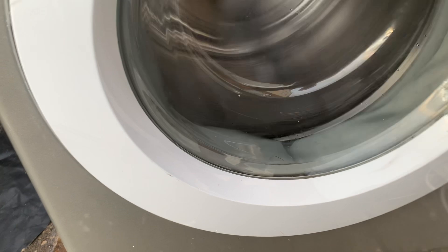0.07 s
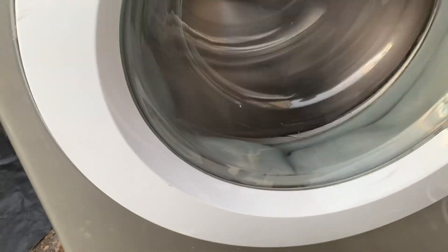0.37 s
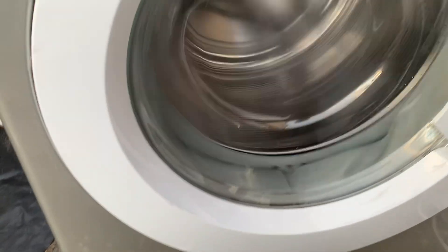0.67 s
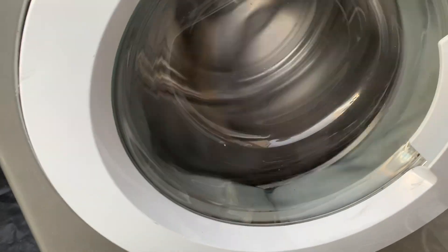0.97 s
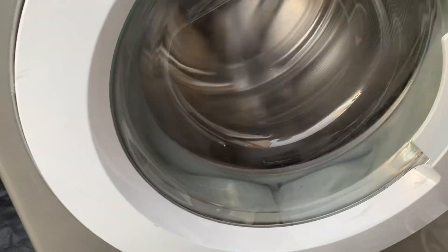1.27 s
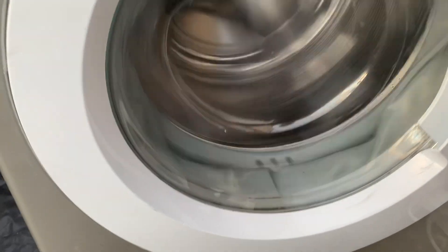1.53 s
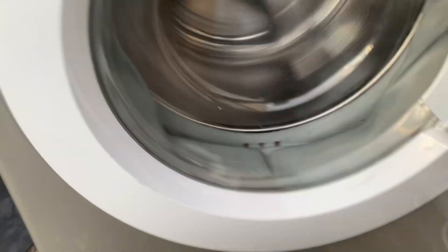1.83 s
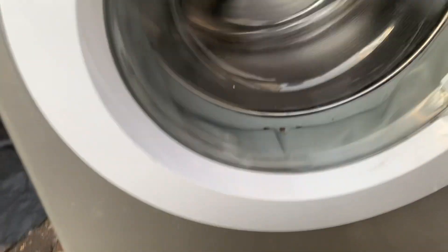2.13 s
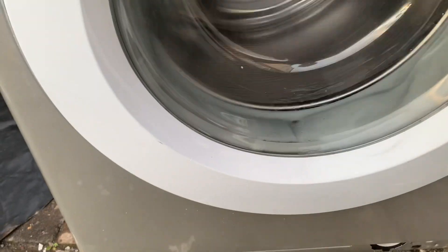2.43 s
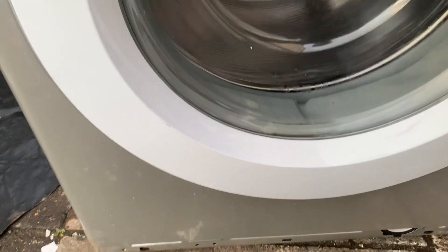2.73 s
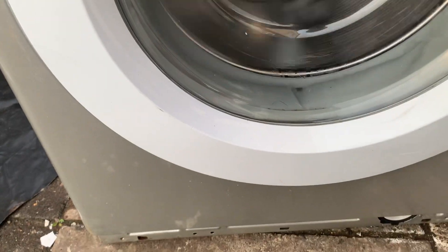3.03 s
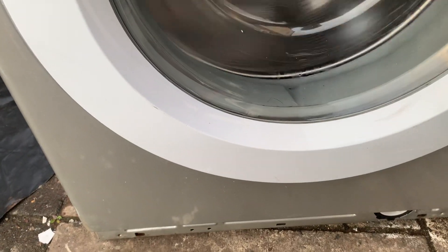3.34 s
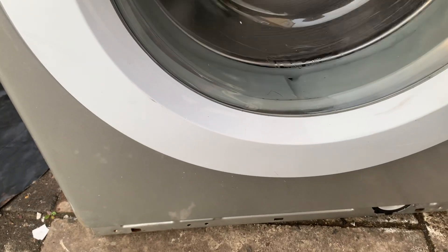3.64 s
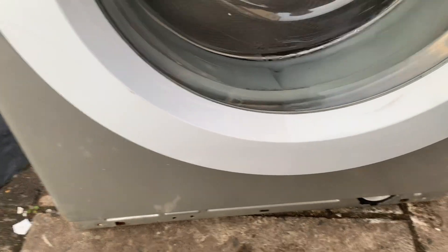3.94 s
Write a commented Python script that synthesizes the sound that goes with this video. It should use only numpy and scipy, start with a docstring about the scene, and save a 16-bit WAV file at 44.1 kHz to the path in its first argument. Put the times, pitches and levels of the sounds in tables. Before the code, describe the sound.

A washing machine rumbles close by outdoors as a loose item thuds and rattles in the steel drum. It clinks four times on the glass door, then the rumble fades to light bumps and rubs.

```python
"""Soft booms and a steel rattle: a loose item tumbles in a washing machine, outdoors, close to the mics.
Its blows boom through the cabinet and ring the drum; four times it clinks on the glass door.
Then the rumble dies away, leaving light bumps and rubs as the drum runs on, brushing the door seal.
The paving adds short reflections over faint open air; the recorder colours and spreads the treble."""
import sys
import numpy as np
from scipy import signal
from scipy.fft import rfft, irfft
from scipy.io import wavfile
from scipy.ndimage import uniform_filter1d

SR = 44100
rng = np.random.default_rng(int(sys.argv[2]) if len(sys.argv) > 2 else 0)


def master(y):
    """Save y as 16-bit WAV."""
    cut = np.clip(np.atleast_2d(y).T, -1, 1)
    pcm = np.round(cut * 32767)  # scale
    wavfile.write(sys.argv[1], SR, pcm.astype(np.int16))


N = 176400

# how hard the drum shakes: t/s, boom/dB, rattle/dB
SHAKE_LEVELS = [(0, -37, -61), (0.601, -33.5, -62), (1.152, -36.5, -61), (1.269, -28.5, -57),
                (1.37, -35, -61), (1.498, -27.5, -56), (1.741, -32.5, -53.5), (1.88, -34.5, -57.5),
                (2.0, -31, -50.5), (2.078, -31, -52.5), (2.2, -38.5, -58), (2.281, -31.5, -56.5),
                (2.37, -41, -66.5), (2.53, -48, -85), (2.699, -57.5, -82), (2.931, -61, -90),
                (3.12, -68, -85), (3.38, -54, -86.5), (3.53, -72.5, -81.5), (3.7, -68.5, -84),
                (3.87, -64.5, -92.5), (4, -63, -75)]
# spectrum of small contacts on the drum: f/Hz, level/dB
RATTLE_SPECTRUM = [(200, 3), (400, 4), (600, 4), (800, -5.5), (1100, -9.5), (1500, -14.5), (1800, -23.5),
                   (2600, -26.5), (3150, -39.5), (3700, -34), (4500, -35.5), (6000, -50), (9000, -41.5),
                   (13000, -63.5)]
# modes of the steel drum: f/Hz, level/dB, t60/s (capped in ring)
DRUM_MODES = [(219, -4.5, .2), (264, 6, 0.16), (320.5, -7, 0.24), (374.7, 0.5, 0.081), (449, -10.5, 0.2),
              (526, -8, 0.062), (714, -2.5, 0.11), (744, -4.5, 0.079), (854, -14, 0.16), (1103, -10, 0.08),
              (1403, -12.5, 0.11), (1482, -14.5, 0.14), (1805, -22, .1), (2180, -22, 0.094)]

CHATTER_PER_S, CHATTER_SCATTER_DB = 2500, 3
SHELL_RISE_S, TAP_RISE_S, LONGEST_RING_S = 0.0094, 0.0043, 0.2
MONO_BELOW_HZ = 965


def rumble(t):
    """Tumbling shakes the cabinet and rattles the drum."""
    # boom of the cabinet: f/Hz, level/dB
    boom_spectrum = [(20, -33), (32, -3.5), (42, 5), (56, 5), (74, -6.5), (100, 1.5), (135, 0.5), (170, -9),
                     (225, -14.5), (265, -13.5), (310, -20.5), (420, -34), (700, -78.5), (2500, -100)]
    times, boom_db, rattle_db = np.array(SHAKE_LEVELS).T
    boom = unit(colour(clicks(N, per_s=260, scatter_db=2.5), boom_spectrum))
    contacts = clicks(N, per_s=700, scatter_db=1.5)
    steel = unit(convolve(contacts, ring(DRUM_MODES)))
    rattle = unit(colour(contacts, RATTLE_SPECTRUM)) + undb(-10) * steel
    return boom * undb(np.interp(t, times, boom_db)) + rattle * undb(np.interp(t, times, rattle_db))


def thud(steel_db, t60):
    """One soft blow booms in the tub and rings the low modes of the drum."""
    # a soft contact: f/Hz, level/dB
    thud_spectrum = [(25, -25.5), (50, -8), (85, 0), (120, 4), (160, -5.5), (220, -17.5), (400, -38),
                     (900, -59.5), (3000, -100)]
    # modes of the tub in its cabinet: f/Hz, level/dB, t60/s (capped in ring)
    tub_modes = [(49.6, -4, 0.16), (107.8, -3, .13), (142, -4.5, 0.092), (173.4, -10, 0.4)]
    impact = blow(colour(chatter(t60), thud_spectrum))
    tub = blow(ring(tub_modes) * swell(SHELL_RISE_S) ** 2)
    steel = blow(cut(ring(DRUM_MODES), 333, "low"))
    return blow(impact + undb(-6) * tub) + undb(steel_db) * steel


def drops():
    """The item drops on the drum wall, a thud each time."""
    # landings: t/s, level/dB, steel ring relative to the boom/dB
    landings = [(0.104, -32, -13), (0.156, -30.5, -27), (0.263, -30, -16), (.432, -40, -9.5),
                (0.461, -31, -17), (.611, -33.5, -9.5), (0.644, -29.5, -27), (0.997, -33.5, -9),
                (1.247, -22, -13.5), (1.315, -35.5, -15), (1.476, -30.5, -5), (1.55, -32, -22.5),
                (1.664, -28.5, -19.5), (1.838, -28, -25), (1.906, -22, -29), (1.961, -25, -6.5),
                (2.018, -27.5, -8.5), (2.234, -32, -11), (2.44, -47, -18.5), (2.495, -45, -22),
                (2.633, -38, -30), (2.722, -47.5, -9), (2.771, -44, -12), (2.829, -45, -15),
                (2.97, -54, -10), (3.162, -51.5, -14), (3.289, -53.5, -4.5), (3.324, -50.5, -8.5),
                (3.574, -57, -7.5), (3.727, -56.5, -30.5), (3.812, -57.5, -32), (3.868, -58, -23.5),
                (3.937, -68.5, 3)]
    out = np.zeros(N)
    for start, db, steel_db in landings:
        add(out, start, undb(db) * thud(steel_db, t60=0.081))
    return out


def door_knocks():
    """The item clinks on the door and the shell clatters; it lands, ringing steel and cabinet."""
    # strikes: t/s, bright clatter/dB, clink/dB, shell/dB, steel ring/dB, cabinet/dB, landing lag/s
    strikes = [(1.552, -60.5, -53.5, -44, -42, -34.5, .011), (1.8, -47, -46, -33, -33.5, -27, .005),
               (1.936, -63.5, -60.5, -37, -45, -28.5, .007), (2.102, -49.5, -54, -35, -37.5, -25, .013)]
    # first crack of contact: f/Hz, level/dB
    crack_spectrum = [(3200, -4.5), (4800, -2), (5600, -11.5), (7100, 4), (9800, 1), (12300, -15.5),
                      (13500, -31.5)]
    # bright clatter of a knock, with the recorder's emphasis near 8 kHz: f/Hz, level/dB
    bright_spectrum = [(2000, -61), (4500, -10.5), (5700, -33.5), (7000, -21.5), (7850, -20), (8050, 2.5),
                       (8520, 4.5), (8750, -15.5), (9500, -16), (10500, -29), (12300, -62), (14000, -69.5)]
    # clatter of the drum shell: f/Hz, level/dB
    shell_spectrum = [(150, 4.5), (370, 11.5), (520, -2), (735, 6.5), (930, -10), (1110, -4.5),
                      (1280, -11.5), (1520, -7.5), (1950, -16), (2600, -15), (2900, -26.5), (3350, -32),
                      (3800, -25.5), (4800, -34), (5600, -44.5), (7000, -32.5), (10000, -58.5),
                      (13000, -58.5)]
    # door modes at 1.4-4.8 kHz, plus a brief high shimmer: f/Hz, level/dB, t60/s
    clink_tones = [(1413, 7, 0.12), (4200, -11.5, 0.034), (4780, -5, 0.043), (8230, -5.5, 0.087),
                   (8680, -8.5, .07), (9430, -10.5, .035)]
    out = np.zeros(N)
    for start, bright_db, clink_db, shell_db, steel_db, cabinet_db, lag in strikes:
        contact = chatter(t60=0.061) * swell(0.0058)
        crack = blow(colour(chatter(t60=0.016), crack_spectrum))
        bright = blow(blow(colour(contact, bright_spectrum)) + undb(-12) * crack)
        shell = blow(colour(chatter(t60=0.11) * swell(SHELL_RISE_S), shell_spectrum))
        clink = blow(ring(clink_tones))
        add(out, start, undb(bright_db) * bright + undb(clink_db) * clink + undb(shell_db) * shell)
        # the item's hard edge rings the upper modes
        steel = blow(cut(ring(DRUM_MODES), 370, "high") * swell(TAP_RISE_S))
        cabinet = thud(steel_db=-6.5, t60=0.21)
        add(out, start + lag, undb(steel_db) * steel + undb(cabinet_db) * cabinet)
    return out


def taps():
    """Hard edges of the item tick against the steel; each spot has its own short note."""
    # light touches: t/s, level/dB, note f/Hz, note level/dB
    touches = [(0.044, -61, 1037, -62), (.144, -68, 884, -58), (0.205, -63.5, 1108, -68),
               (.313, -61, 937, -56.5), (.365, -69, 760, -64.5), (.377, -61.5, 1040, -68),
               (.413, -66, 775, -66), (.437, -57.5, 755, -65.5), (.616, -61, 753, -61),
               (0.74, -62, 1143, -65.5), (0.801, -57.5, 1528, -84), (1.002, -60, 1175, -72.5),
               (1.058, -68, 820, -69.5), (1.088, -72, 2120, -78.5), (1.203, -62.5, 1475, -72.5),
               (1.368, -57, 1022, -69), (1.228, -53.5, 1870, -68.5), (1.462, -47, 1930, -66.5),
               (1.638, -57, 839, -71), (1.654, -47.5, 2280, -66), (1.72, -49, 1910, -68),
               (1.982, -46.5, 4570, -73.5), (2.013, -51.5, 2280, -68.5), (2.218, -61.5, 753, -57.5),
               (2.716, -76, 1684, -79), (2.77, -69, 720, -69), (3.265, -63, 1424, -75),
               (3.285, -61, 1160, -79), (3.43, -80, 3660, -88)]
    # a tick on steel: f/Hz, level/dB
    tick_spectrum = [(200, 0.5), (500, -1), (1000, 0), (1500, -7), (2500, -19.5), (3100, -42), (4600, -35),
                     (7000, -47), (13000, -62)]
    out = np.zeros(N)
    for start, db, hz, note_db in touches:
        push = chatter(t60=0.043) * swell(TAP_RISE_S)
        tick = blow(colour(push, tick_spectrum))
        steel = blow(convolve(push, ring(DRUM_MODES)))
        note = blow(ring([(hz, 0, 0.023)]) * swell(TAP_RISE_S))
        add(out, start, undb(db) * blow(tick + undb(5.5) * steel) + undb(note_db) * note)
    return out


def rubs(t):
    """The item slides along the drum: gritty swells, each with one strong resonance."""
    # slides: peak t/s, half-width/s, level/dB, resonance f/Hz
    slides = [(1.236, 0.018, -57.5, 1300), (1.469, 0.0078, -48.5, 1116), (1.994, 0.04, -54.5, 1195),
              (2.603, 0.029, -74, 830), (2.796, 0.061, -73, 690), (3.288, 0.035, -71, 1230),
              (3.6, 0.073, -76, 694), (3.997, 0.011, -53, 1150)]
    out = np.zeros(N)
    for peak, half_width, db, hz in slides:
        grit = unit(colour(clicks(N, CHATTER_PER_S, CHATTER_SCATTER_DB), RATTLE_SPECTRUM))
        rub = unit(resonance(grit, hz, width=0.33) + undb(-7) * grit)
        out += undb(db) * rub * np.exp(-((t - peak) / half_width) ** 2)
    return out


def seal_swish(t):
    """Once a turn the drum brushes the door seal and catches on it with a small tick."""
    # strength of the swish, turn by turn: level/dB
    turn_levels = [-82.5, -80, -79.5, -83, -80, -79, -87.5, -81.5, -77, -80, -83, -83]
    turn_s, first_s, catch_s, brush_s = 0.333, 0.236, 0.005, 0.038
    turn, within = np.divmod(t - first_s + turn_s / 2, turn_s)
    db = np.array(turn_levels)[np.clip(turn.astype(int), 0, len(turn_levels) - 1)]
    from_catch = np.abs(within - turn_s / 2)
    envelope = np.exp(-from_catch / catch_s) + undb(-9) * np.exp(-(from_catch / brush_s) ** 2)
    friction = clicks(N, CHATTER_PER_S, CHATTER_SCATTER_DB)
    for _ in range(2):
        friction = resonance(friction, 4100, width=0.5)
    return undb(db) * friction * envelope


def thin_hiss(t):
    """A thin, grainy hiss near 8 kHz, coloured by the recorder, follows the rattle and flares briefly."""
    # flares of the hiss: peak t/s, half-width/s, level/dB
    flares = [(1.71, .02, -85), (1.973, .015, -78), (2.02, .012, -77.5), (2.057, .014, -81.5),
              (2.224, .006, -86), (2.293, .016, -79)]
    # colour of the hiss: f/Hz, level/dB
    hiss_spectrum = [(3000, -7.5), (7800, -22.5), (8050, 9.5), (8500, 8.5), (9300, -8), (10500, -15.5),
                     (13000, -40)]
    times, _, rattle_db = np.array(SHAKE_LEVELS).T
    rattle_rise_db = np.interp(t, times, rattle_db) - rattle_db[0]
    gain = undb(-92.5 + 0.77 * rattle_rise_db)
    for peak, half_width, db in flares:
        gain += undb(db) * np.exp(-((t - peak) / half_width) ** 2)
    return gain * unit(colour(clicks(N, per_s=680, scatter_db=4.5), hiss_spectrum))


def yard(x):
    """Add short scattered reflections from the paving and the front panel, mostly in the treble."""
    echo = rng.standard_normal(SR) * fade(t60=0.087) * swell(0.0063)
    echo = cut(echo / np.sqrt(np.sum(echo ** 2)), MONO_BELOW_HZ, "high")
    return x + undb(-16.5) * convolve(x, echo)


def open_air():
    """A faint steady hush, separate in each channel."""
    # outdoor air: f/Hz, level/dB
    air_spectrum = [(30, 5.5), (200, 12.5), (600, -4.5), (1200, -7.5), (2500, -11.5), (3150, -21.5),
                    (4200, -10.5), (5500, -20), (7700, -14.5), (8200, -13), (9800, -13), (11500, -26),
                    (14000, -20.5)]
    return undb(-72.5) * np.array([unit(colour(rng.standard_normal(N), air_spectrum)) for _ in range(2)])


def stereo_processing(left, right):
    """The recorder shifts the treble's phase between the channels, band by band; the top leans right."""
    # phase lag given to the right channel: f/Hz, phase/rad
    right_lag = [(1250, 1.31), (1450, -2.5), (1750, 1.44), (2500, -0.3), (2900, -4.5), (3550, -3),
                 (3800, 1), (4800, 0.57), (5200, 2), (5900, 11.5), (6400, 5), (7100, 7.5), (7600, 21),
                 (8200, 9), (9300, 12.5), (11300, 7.5)]
    f = np.fft.rfftfreq(2 * N, 1 / SR)
    hz, radians = np.array([(MONO_BELOW_HZ, 0)] + list(right_lag)).T
    phase_lag = np.exp(-1j * np.interp(f, np.sort(hz), radians))
    left_lift_db, right_lift_db = 2, 18
    lift_share = np.interp(f, [7700, 8000, 11000, 12500], [0, 1, 1, 0.5])
    left = rfft(left, 2 * N) * undb(left_lift_db * lift_share)
    right = rfft(right, 2 * N) * undb(right_lift_db * lift_share) * phase_lag
    return irfft(np.array([left, right]))[:, :N]


def ring(modes):
    """One second of damped modes; level and pitch vary a little from blow to blow."""
    t = np.arange(SR) / SR
    out = np.zeros(SR)
    for hz, db, t60 in modes:
        gain = undb(db + 0.4 * rng.standard_normal())
        pitch = hz * (1 + 0.008 * rng.standard_normal())
        out += gain * fade(min(t60, LONGEST_RING_S)) * np.sin(2 * np.pi * pitch * t)
    return out


def clicks(length, per_s, scatter_db):
    """Random contacts of uneven strength."""
    contacts = (rng.random(length) < per_s / SR) * rng.choice([-1, 1], length)
    return contacts * undb(scatter_db * np.clip(rng.standard_normal(length), -2, 2))


def chatter(t60):
    """A burst of tiny rebounds that dies away."""
    return clicks(SR, CHATTER_PER_S, CHATTER_SCATTER_DB) * fade(t60)


def fade(t60):
    """One second of decay, falling 60 dB in t60 seconds."""
    return np.exp(-np.log(1000) * np.arange(SR) / SR / t60)


def swell(rise_s):
    """One second that rises to full strength."""
    return 1 - np.exp(-np.arange(SR) / SR / rise_s)


def colour(x, spectrum):
    """Minimum-phase filter through points of f/Hz, level/dB."""
    hz, db = np.array(spectrum, float).T
    size = 8192
    f = np.maximum(np.fft.rfftfreq(size, 1 / SR), 1)
    gain = undb(np.interp(np.log(f), np.log(np.sort(hz)), db))
    cepstrum = irfft(np.log(gain))
    # folded forward, so nothing sounds ahead of a blow
    cepstrum[1:size // 2] *= 2
    cepstrum[size // 2 + 1:] = 0
    return convolve(x, irfft(np.exp(rfft(cepstrum))))


def resonance(x, hz, width):
    """One broad resonance at rms 1; the width is a share of its pitch."""
    return unit(signal.lfilter(*signal.iirpeak(hz, 1 / width, fs=SR), x))


def cut(x, hz, kind):
    """Second-order low-pass or high-pass."""
    return signal.sosfilt(signal.butter(2, hz, kind, fs=SR, output="sos"), x)


def convolve(x, response):
    """Play x through a response."""
    return signal.fftconvolve(x, response)[:len(x)]


def undb(db):
    """Decibels to gain."""
    return 10 ** (np.asarray(db) / 20)


def unit(x):
    """Scale to rms 1."""
    return x / np.sqrt(np.mean(x ** 2) + 1e-30)


def blow(x):
    """Scale so that the loudest 25 ms have rms 1."""
    return x / np.sqrt(uniform_filter1d(x ** 2, size=1100).max() + 1e-30)


def add(out, start_s, sound):
    """Mix a sound in at a time."""
    i = int(np.clip(start_s * SR, 0, N - 1))
    out[i:i + len(sound)] += sound[:N - i]


def scene():
    """The machine stands close by in the yard, with open air behind it."""
    t = np.arange(N) / SR
    machine = rumble(t) + drops() + taps() + door_knocks() + rubs(t) + thin_hiss(t) + seal_swish(t)
    return stereo_processing(yard(machine), yard(machine)) + open_air()


def record(dry):
    """The recorder folds the bass to mono and cuts the top above 14 kHz."""
    mid, side = (dry[0] + dry[1]) / 2, (dry[0] - dry[1]) / 2
    side = signal.sosfiltfilt(signal.butter(4, MONO_BELOW_HZ, "high", fs=SR, output="sos"), side)
    top_cut = signal.ellip(8, 0.2, 70, 14000, fs=SR, output="sos")
    return signal.sosfilt(top_cut, np.array([mid + side, mid - side]))


dry = scene()
out = record(dry)
master(out)
```